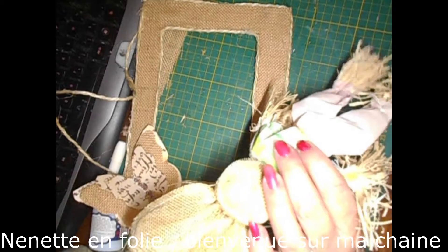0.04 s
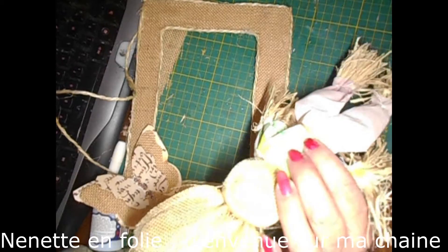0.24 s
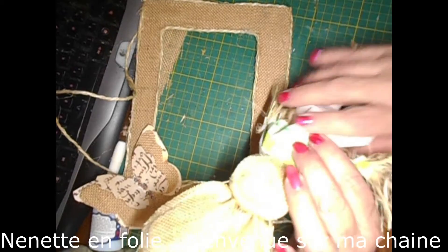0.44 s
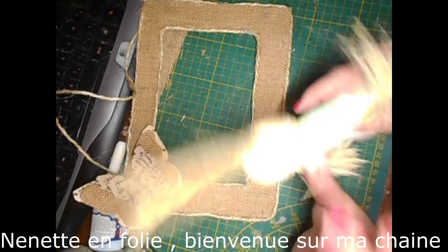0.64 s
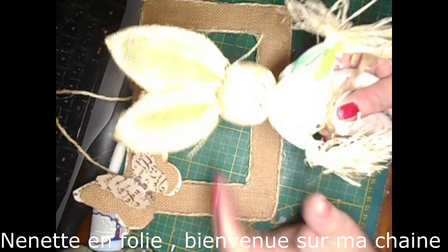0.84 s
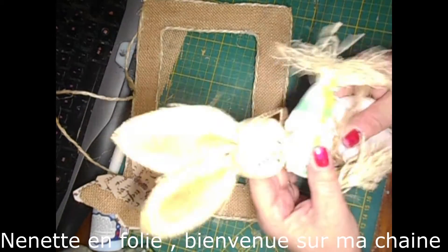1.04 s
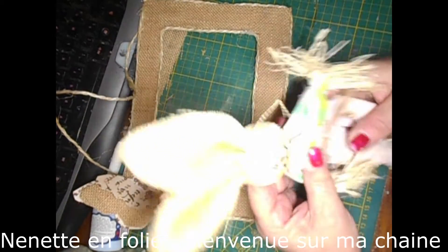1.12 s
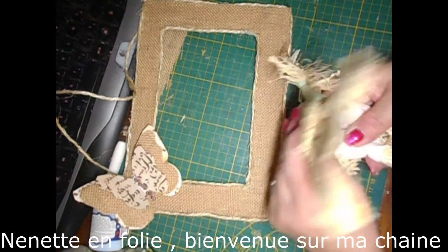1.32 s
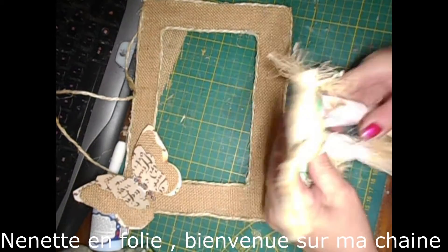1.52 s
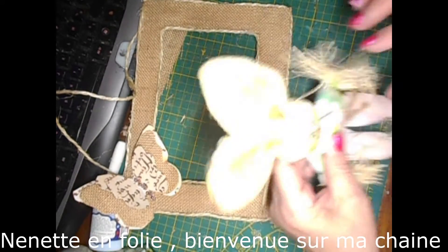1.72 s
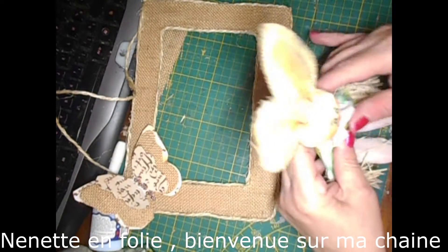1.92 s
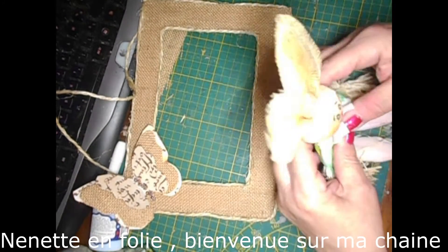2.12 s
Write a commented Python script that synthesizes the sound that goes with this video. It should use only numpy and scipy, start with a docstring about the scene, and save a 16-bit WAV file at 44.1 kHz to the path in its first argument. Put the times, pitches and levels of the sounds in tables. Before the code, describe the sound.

Dry raffia and cloth rustle as an ornament is handled. At about 0.1 s a small hard object clacks twice on a table and settles, followed by a quieter gap. From 0.45 s to the end at roughly 2.1 s, dense crisp crackling comes in uneven surges, with sharp strand snaps near 0.57, 0.95 and 1.4 s and nail ticks near 1.27 and 2.0 s. Close microphone, small room, faint hum.

```python
"""A raffia and cloth ornament is picked up and turned by hand at a craft table, close to a webcam microphone.
Its dry strands slide in a dense fine crackle of clicks and fibre rings, and a few snap or flick free.
Cloth and padding rub as filtered clicks and noise; fingers tap as short rings, nails tick as brief bursts.
At the start a small hard object clacks down and settles: noisy cracks, its decaying modes, table knocks.
The room is small, with near reflections, a short tail, a steady hum and soft noise."""
import sys
import numpy as np
from scipy import signal
from scipy.fft import rfft, irfft
from scipy.io import wavfile

SR = 44100
rng = np.random.default_rng(int(sys.argv[2]) if len(sys.argv) > 2 else 0)


def transcribe(u):
    """Save the signal u as a 16-bit wav file named by the first command-line argument.

    u: samples, shape (n,) or (channels, n), limited to [-1, 1]; the rate is SR.
    q: integer samples, one column per channel.
    """
    v = np.clip(np.atleast_2d(u).T, -1, 1)
    q = np.round(v * 32767).astype(np.int16)
    wavfile.write(sys.argv[1], SR, q)


N = 94903  # length of the scene [samples]


def amp(db):
    """Decibels to gain."""
    return 10 ** (np.asarray(db) / 20)


def unit(x):
    """Scales to an rms of one."""
    return x / np.sqrt(np.mean(x ** 2) + 1e-20)


def read(points, hz):
    """Reads a table on a log-frequency axis."""
    f, value = np.transpose(points)
    return np.interp(np.log(hz + 1), np.log(f + 1), value)


def add(mix, s, sound):
    """Mixes a sound in at a time in seconds."""
    part = mix[max(round(s * SR), 0):][:len(sound)]
    part += sound[:len(part)]


def causal(points, size=2048):
    """Minimum-phase impulse response: the given spectrum with no ringing before it."""
    hz = abs(np.fft.fftfreq(size, 1 / SR))
    log_gain = np.log(amp(read(points, hz)))
    spectrum = np.exp(np.conj(signal.hilbert(log_gain)))
    return np.fft.ifft(spectrum).real[:size // 2]


def colour(x, points):
    """Gives white sound a spectrum, keeping its power."""
    response = causal(points)
    return signal.fftconvolve(x, response / np.linalg.norm(response))[:len(x)]


def burst(length, fall, first_db=0, size=2048):
    """A first break and a quick run of micro-fractures that holds for its length, then dies."""
    t = np.arange(size) / SR
    fractures = rng.choice([-1., 1.], size)
    envelope = np.exp(-np.maximum(t - length, 0) / fall)
    return fractures * envelope * amp(first_db * (t == 0))


def blip(db, hz, length):
    """A ring that swells to its peak over the length in seconds, then soon dies."""
    t = np.arange(SR // 5) / SR
    envelope = t / length * np.exp(1 - t / length)
    return amp(db) * envelope * np.sin(2 * np.pi * hz * t)


CLUMP_S = .005  # spacing of the random clump levels [s]


def slips(per_s, spread_db, clump_db):
    """Tiny stick-slip clicks of uneven size that come in clumps."""
    sizes = amp(spread_db * np.minimum(rng.exponential(1, N), 5)) * rng.choice([-1, 1], N)
    knots = np.arange(0, N / SR + CLUMP_S, CLUMP_S)
    clumps = np.interp(np.arange(N) / SR, knots, rng.standard_normal(len(knots)))
    happens = rng.random(N) < per_s / SR
    return unit(sizes * happens * amp(clump_db * clumps))


# Handling of the raffia: (time [s], crisp strand level [dB], duller cloth rub level [dB])
HANDLING_LEVELS = [(0, -66, -52.5), (0.041, -60, -52.5), (.075, -53.5, -49), (.13, -63, -45.5),
                   (.18, -74, -48.5), (.225, -58, -59), (.33, -59, -63.5), (0.45, -54.5, -56),
                   (0.458, -42.5, -49.5), (0.509, -43, -49), (0.519, -34, -42.5), (.55, -37.5, -45),
                   (.66, -35, -45.5), (.70, -41, -46), (0.751, -32, -73), (.765, -37.5, -61),
                   (0.798, -41.5, -54), (.84, -42, -48.5), (.885, -41, -43.5), (.915, -43, -54),
                   (.94, -35.5, -52), (.975, -46.5, -52), (1.065, -50, -57), (1.10, -43, -49),
                   (1.134, -34, -45), (1.175, -42.5, -48), (1.23, -40, -47), (1.265, -34.5, -42),
                   (1.30, -39.5, -48), (1.38, -41, -52.5), (1.406, -38, -49), (1.49, -47, -58.5),
                   (1.566, -38.5, -48), (1.61, -38.5, -48.5), (1.647, -34, -40), (1.701, -40.5, -55),
                   (1.741, -31.5, -47), (1.77, -47.5, -56), (1.821, -36.5, -62), (1.836, -57, -62),
                   (1.875, -49, -61.5), (1.944, -37.5, -49), (1.985, -45.5, -47), (2.005, -37, -45.5),
                   (2.04, -51, -50.5), (2.1057, -51, -50), (2.11, -34, -42.5), (2.15, -32.5, -37.5)]
# Crisp spectrum of the sliding strands: (frequency [Hz], relative density [dB per Hz])
STRAND_SPECTRUM = [(300, -68), (1000, -19.5), (2000, -13.5), (4000, -8), (6500, -1), (9000, 2.5),
                   (10300, 2), (13000, -4.5)]
# Spectrum of the cloth rub: (frequency [Hz], relative density [dB per Hz])
CLOTH_SPECTRUM = [(150, -43.5), (600, -24), (1500, -9), (2300, -3.5), (4000, -1), (6000, 0), (12000, -24.5)]
# Muffled rub of the stuffed body: (frequency [Hz], relative density [dB per Hz])
PADDING_SPECTRUM = [(200, -28.5), (450, -6.5), (720, 5), (1500, 1.5), (3000, -10.5)]
FIBRE_DB, CLICK_DB = -4, -1.5  # shares of fibre rings and bare clicks in the crackle
PADDING_DB, PADDING_FOLLOW = -42.5, 0.39  # padding rises 0.39 dB for each dB of cloth


def rustle():
    """Strands, cloth and stuffing slide under the hands: dry clicks, duller clicks and muffled noise."""
    t = np.arange(N) / SR
    times, strand_levels, cloth_levels = np.transpose(HANDLING_LEVELS)
    strands_db = np.interp(t, times, strand_levels)
    cloth_db = np.interp(t, times, cloth_levels)
    clicks = slips(per_s=4500, spread_db=2, clump_db=0.5)
    crackle = amp(CLICK_DB) * clicks + amp(FIBRE_DB) * fibres()
    strands = crackle * amp(strands_db)
    cloth = slips(per_s=6200, spread_db=2.5, clump_db=3.0) * amp(cloth_db)
    padding = rng.standard_normal(N) * amp(PADDING_DB + PADDING_FOLLOW * cloth_db)
    return colour(strands, STRAND_SPECTRUM) + colour(cloth, CLOTH_SPECTRUM) + colour(padding, PADDING_SPECTRUM)


FIBRE_LOW_HZ, FIBRE_HIGH_HZ = 2165, 12100  # pitch range of the fibres
FIBRE_CYCLES = 6.9  # cycles in which a ring falls to 1/e


def fibres(count=24):
    """Each fibre rings briefly at its own pitch whenever it slips."""
    t, out = np.arange(768) / SR, np.zeros(N)
    for hz in np.linspace(FIBRE_LOW_HZ, FIBRE_HIGH_HZ, count):
        ping = np.exp(-hz * t / FIBRE_CYCLES) * np.sin(2 * np.pi * hz * t)
        plucks = slips(per_s=80, spread_db=1.0, clump_db=4.0)
        out += unit(signal.oaconvolve(plucks, ping)[:N])
    return unit(out)


# Single strands that buckle: (time [s], level [dB], length [s], duller part re level [dB])
STRAND_SNAPS = [(0.1964, -41.5, 0.004, -2.5), (.2475, -42.5, 0.0033, -11), (0.3433, -42.5, 0.0014, -5),
                (0.5135, -32, 0.0045, -15), (0.561, -29.5, 0.0025, -18), (0.573, -24, 0.0025, -29),
                (0.595, -31, 0.0042, -25), (0.618, -35, 0.0008, -14), (0.651, -29.5, 0.0021, -8),
                (0.753, -32, 0.0083, -26), (0.901, -34, 0.0062, 0), (0.935, -36, 0.0018, -15),
                (0.9427, -26.5, 0.0062, -14), (0.9484, -22.5, 0.0013, -17), (0.98, -36.5, 0.001, -1.5),
                (1.016, -37, 0.0012, -20), (1.0193, -33.5, 0.0012, -8.5), (1.073, -43, 0.0028, -4),
                (1.144, -36, 0.0013, 4.5), (1.2735, -31, 0.001, -21), (1.394, -26, 0.00084, -28),
                (1.398, -27.5, 0.00094, -42), (1.452, -38.5, 0.002, -6), (1.7764, -34.5, 0.0037, -14),
                (2.0605, -36.5, 0.0013, -21), (2.108, -33, 0.0026, -24)]
# Crisp part of a snap: (frequency [Hz], relative density [dB per Hz])
CRISP_SPECTRUM = [(300, -28.5), (2000, -28), (4500, -14.5), (7000, -0.5), (9800, 3), (13000, -2.5)]
# Duller part of a snap: (frequency [Hz], relative density [dB per Hz])
BUCKLE_SPECTRUM = [(200, -38), (900, -19), (1700, -16), (2600, -6), (4400, -4), (6500, -4), (12000, -44)]
# Stiff straws that flick free: (time [s], level [dB], pitch [Hz])
STRAW_TWANGS = [(.52, -47, 6100), (0.757, -30.5, 5900), (.767, -38, 5200), (2.06, -50, 6330)]
SNAP_FALL_S, TWANG_S = .0009, .0012  # decay after a snap's run, swell of a twang
SNAP_CRACK_DB = 12  # the first break stands above the run that follows


def snaps():
    """Now and then a strand buckles, a crisp snap with a duller part, or flicks free and rings."""
    crisp, dull, rings = np.zeros((3, N))
    for s, db, length, dull_db in STRAND_SNAPS:
        add(crisp, s, amp(db) * burst(length, SNAP_FALL_S, SNAP_CRACK_DB))
        add(dull, s, amp(db + dull_db) * burst(length, SNAP_FALL_S, SNAP_CRACK_DB))
    for s, db, hz in STRAW_TWANGS:
        add(rings, s, blip(db, hz, TWANG_S))
    return colour(crisp, CRISP_SPECTRUM) + colour(dull, BUCKLE_SPECTRUM) + rings


# Soft taps on the padded body and the table: (time [s], level [dB], pitch [Hz], swell [s])
FINGER_TAPS = [(0, -46, 157, 0.0033), (0.1535, -39.5, 935, 0.0013), (1.0432, -36, 1000, 0.0007),
               (1.2715, -35.5, 880, 0.00081), (1.9935, -42, 434, 0.0011)]
# Fingernails that catch the ornament: (time [s], level of the first contact [dB])
NAIL_TICKS = [(.9012, -37), (1.0732, -24.5), (1.2715, -13), (1.278, -21.5), (1.9928, -17.5)]
# Spectrum of a nail tick: (frequency [Hz], relative density [dB per Hz])
TICK_SPECTRUM = [(250, -21), (700, -10), (1600, -9.5), (4400, -2), (12000, -10)]
TICK_CHATTER_DB, TICK_FALL_S = -13.5, 0.0024  # chatter re first contact, and its decay


def taps():
    """Fingers knock on the padded body and table as short rings; nails tick with a fading chatter."""
    knocks, nails = np.zeros((2, N))
    for s, db, hz, length in FINGER_TAPS:
        add(knocks, s, blip(db, hz, length))
    for s, db in NAIL_TICKS:
        chatter = burst(0, TICK_FALL_S, first_db=-TICK_CHATTER_DB)
        add(nails, s, amp(db + TICK_CHATTER_DB) * chatter)
    return knocks + colour(nails, TICK_SPECTRUM)


RING_RISE_S = 0.00038  # rise of a struck mode


def struck_mode(hz, db, t60, phase=0):
    """A mode rises smoothly, then loses 60 dB in its t60; the phase is in cycles."""
    t = np.arange(SR // 2) / SR
    swell = np.sin(np.pi / 2 * np.minimum(t / RING_RISE_S, 1)) ** 2
    return amp(db - 60 * t / t60) * swell * np.sin(2 * np.pi * (hz * t + phase))


# Blows of the hard object:
# (time [s], ring level [dB], crack level [dB], crack length [s], contact [0 end to 1 side])
OBJECT_BLOWS = [(0.0794, -15.5, -21.5, 0.0036, 0.33), (0.1142, -20.5, -22.5, 0.0061, 1),
                (0.147, -38, -48, .003, 0.69), (0.161, -33, -30.5, 0.00073, 0.85)]
# Modes of the object:
# (frequency [Hz], struck on the end re ring level [dB], on the side re ring level [dB], t60 [s])
OBJECT_MODES = [(1383, -35.5, -32.5, 0.26), (1756, -20.5, -17, 0.034), (2065, -24, -38, 0.12),
                (2305, -22.5, -13, 0.055), (2910, 0.5, -16.5, 0.024), (3100, -13, -14.5, 0.03),
                (3780, -15, -11, 0.05), (4620, -24, -3, 0.03), (4840, 1.5, -13.5, 0.024),
                (5900, 2, -18, 0.034), (6550, 5, -5, 0.015), (7140, 4.5, -14, 0.029),
                (8100, -29, -1.5, 0.027), (8270, -8, -11, 0.059), (8910, 6, -7, 0.012),
                (9940, -20, -1.5, 0.026)]
# Spectrum of the crack: (frequency [Hz], relative density [dB per Hz])
CRACK_SPECTRUM = [(300, -25), (1200, -21), (2200, -5.5), (4000, -8.5), (6500, 0), (10000, -0.5),
                  (13000, -2)]
CRACK_FALL_S = .0013
BEND_LAG_S = .0008  # lag at 3 kHz: bending waves are slower the lower they are


def hard_object():
    """Each blow cracks and rings the modes that its point of contact favours, the low ones last."""
    rings, cracks = np.zeros((2, N))
    for s, ring_db, crack_db, length, place in OBJECT_BLOWS:
        for hz, end_db, side_db, t60 in OBJECT_MODES:
            db = ring_db + np.interp(place, [0, 1], [end_db, side_db])
            lag = BEND_LAG_S * 3000 / hz
            add(rings, s + lag, struck_mode(hz, db, t60, phase=rng.random()))
        add(cracks, s, amp(crack_db) * burst(length, CRACK_FALL_S))
    return rings + colour(cracks, CRACK_SPECTRUM)


# The table top knocks as the object lands and rocks: (time [s], level [dB])
LANDING_KNOCKS = [(0.085, -53), (.118, -44), (.1408, -41.5), (.153, -47.5), (.1665, -41)]
# Modes of the table top: (frequency [Hz], level re knock [dB], t60 [s])
TABLE_TOP_MODES = [(562, -1, 0.1), (709, -17, 0.07)]
# Dead knock of the table top: (frequency [Hz], relative density [dB per Hz])
THUD_SPECTRUM = [(200, -19), (550, -9.5), (1000, 3), (1550, -12), (2500, 5.5), (7000, -22)]
THUD_DB, THUD_FALL_S = 1.5, 0.0079  # thud re knock level, and its decay


def table_top():
    """The table answers the object with dead, noisy thuds and a few ringing modes."""
    rings, thuds = np.zeros((2, N))
    for s, db in LANDING_KNOCKS:
        add(thuds, s, amp(db + THUD_DB) * burst(0, THUD_FALL_S))
        for hz, mode_db, t60 in TABLE_TOP_MODES:
            add(rings, s, struck_mode(hz, db + mode_db, t60))
    return rings + colour(thuds, THUD_SPECTRUM)


# Steady hum: (frequency [Hz], rms level [dB])
HUM_TONES = [(302.5, -58.5), (119, -80)]
# Spectrum of the room noise: (frequency [Hz], relative density [dB per Hz])
FLOOR_SPECTRUM = [(10, -11), (25, 12.5), (36, -6.5), (100, -4.5), (170, -7), (275, 1.5), (400, -8.5),
                  (620, -3.5), (1200, -8.5), (2500, -11.5), (6000, -12.5), (13000, -20.5)]
FLOOR_DB = -59  # rms level of the room noise


def background():
    """A steady hum of sine tones over soft, spectrally shaped room noise."""
    t = np.arange(N) / SR
    hum = np.zeros(N)
    for hz, db in HUM_TONES:
        hum += amp(db) * np.sqrt(2) * np.sin(2 * np.pi * (hz * t + rng.random()))
    gain = amp(read(FLOOR_SPECTRUM, np.fft.rfftfreq(N, 1 / SR)))
    air = irfft(rfft(rng.standard_normal(N)) * gain, N)
    return hum + amp(FLOOR_DB) * unit(air)


# Decay of the small room: (frequency [Hz], t60 [s])
ROOM_DECAY = [(100, 0.42), (1000, 0.79), (4000, 0.12), (12000, 0.22)]
# Near reflections: (delay [s], level re direct sound [dB])
NEAR_ECHOES = [(0.0126, -19), (.026, -25.5)]
ROOM_DB = -15  # energy of the tail re direct sound


def room(x, size=256):
    """A few near reflections and a short diffuse tail of noise that decays by frequency."""
    hz, t, z = signal.stft(rng.standard_normal(SR // 2), SR, nperseg=size)
    decay = amp(-60 * t / read(ROOM_DECAY, hz)[:, None])
    tail = signal.istft(z * decay, SR, nperseg=size)[1]
    response = np.zeros(SR // 2)
    add(response, .009, amp(ROOM_DB) * tail / np.linalg.norm(tail))
    for delay, db in NEAR_ECHOES:
        add(response, delay, amp([db]))
    return x + signal.fftconvolve(x, response)[:N]


def scene():
    """Everything on the table is heard in the room, over the background."""
    on_table = rustle() + snaps() + taps() + hard_object() + table_top()
    return (room(on_table) + background())[None]


# Response of the webcam microphone: (frequency [Hz], gain [dB])
MIC_RESPONSE = [(20, -2), (10300, 0), (11000, -13.5), (11800, -13.5), (12400, -30), (13000, -45)]
EDGE_HZ = 13090  # band limit


def record(dry):
    """The microphone's treble falls in a step, then a steep low-pass sets the band limit."""
    heard = signal.fftconvolve(dry, causal(MIC_RESPONSE)[None])[:, :N]
    low_pass = signal.firwin(511, EDGE_HZ, window=("kaiser", 9), fs=SR)
    return signal.oaconvolve(heard, low_pass[None], "same")


dry = scene()
out = record(dry)
transcribe(out)
```